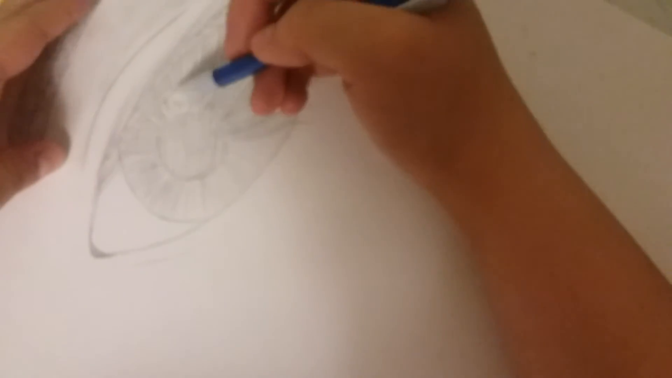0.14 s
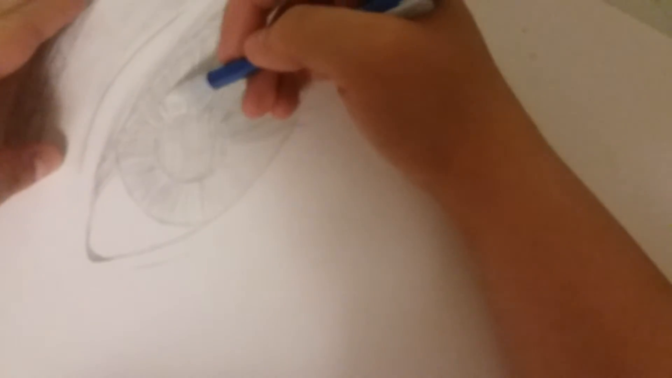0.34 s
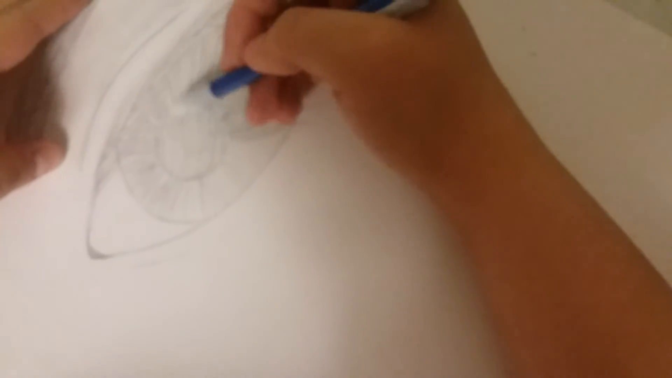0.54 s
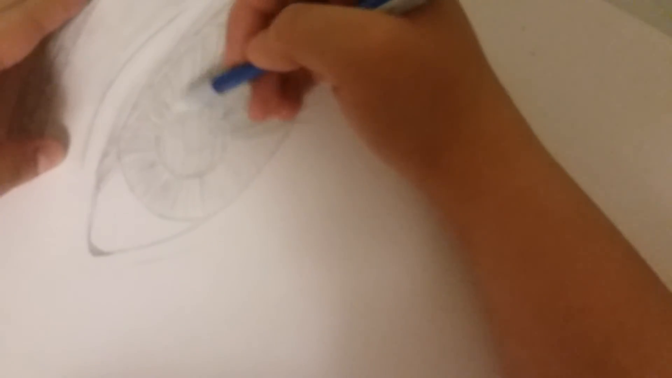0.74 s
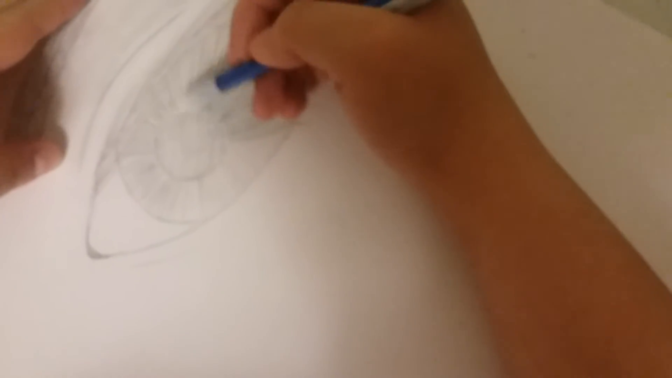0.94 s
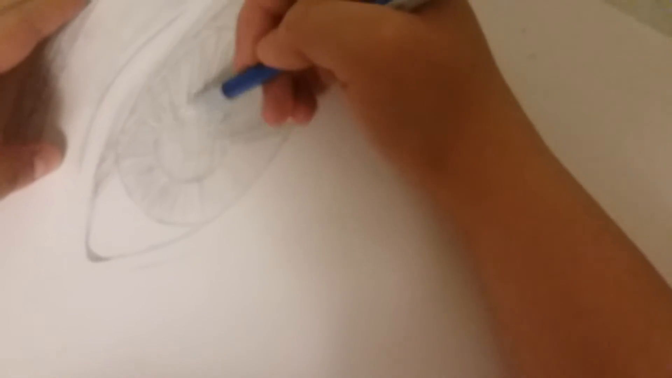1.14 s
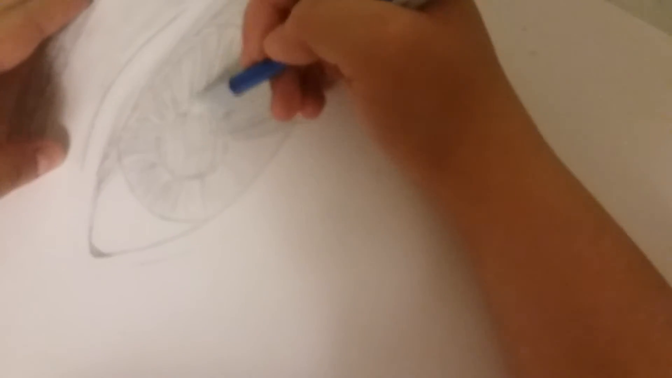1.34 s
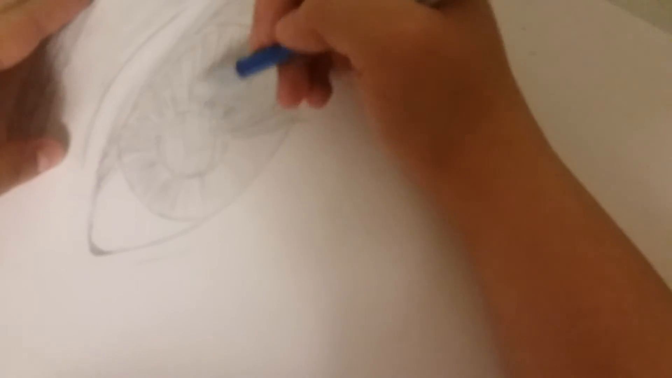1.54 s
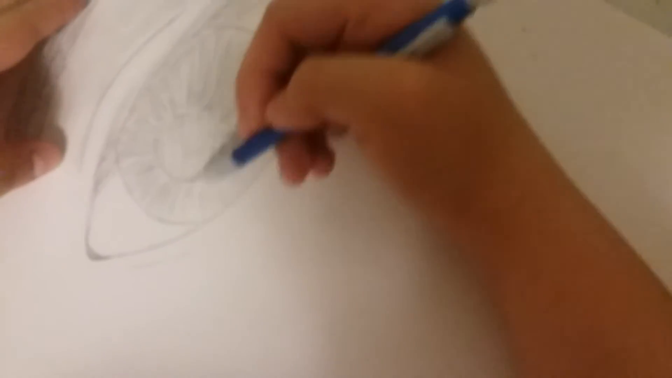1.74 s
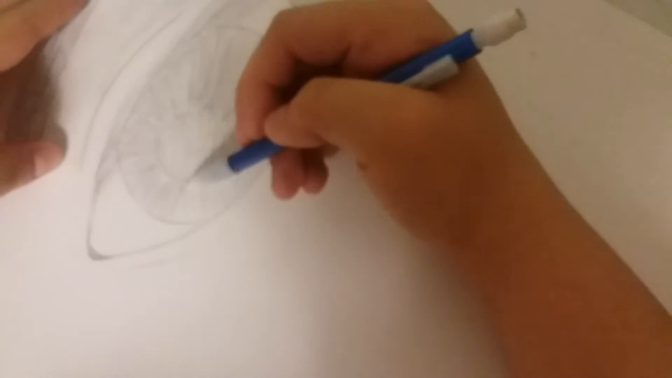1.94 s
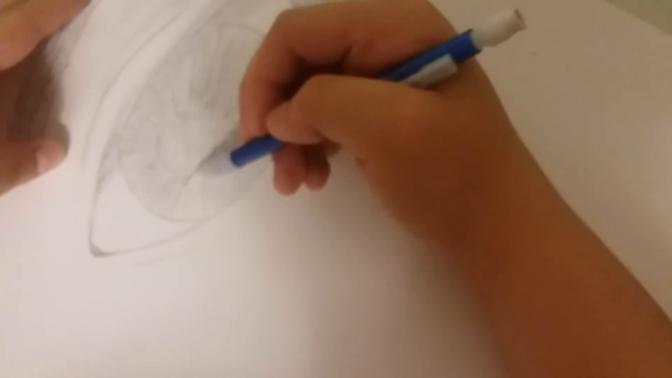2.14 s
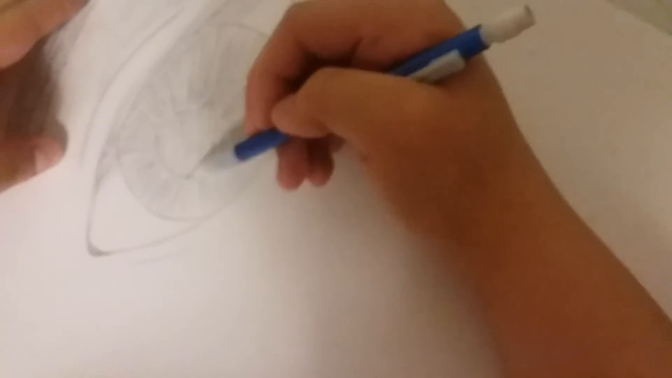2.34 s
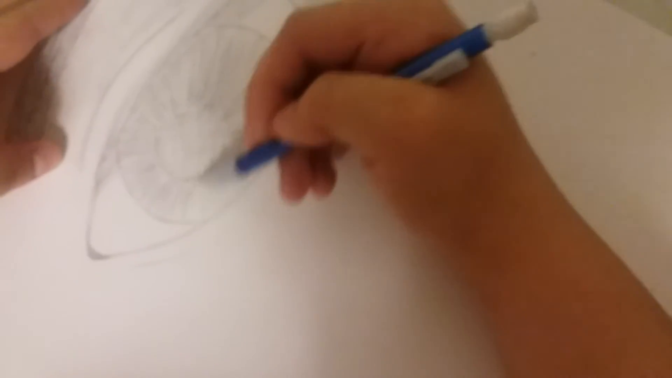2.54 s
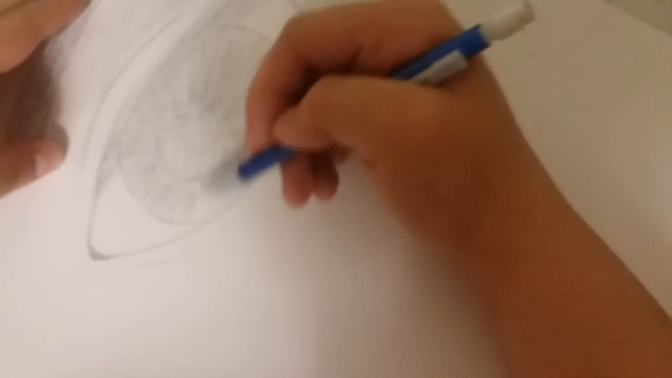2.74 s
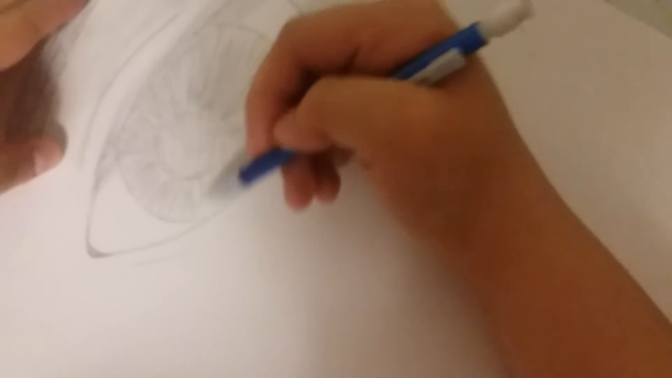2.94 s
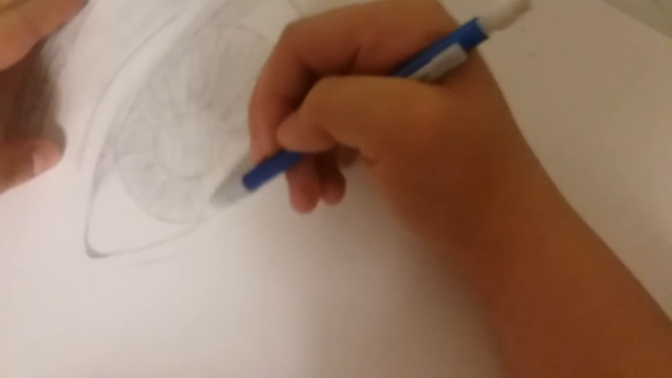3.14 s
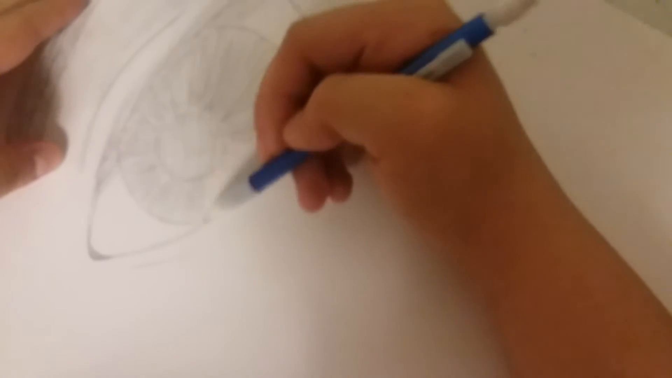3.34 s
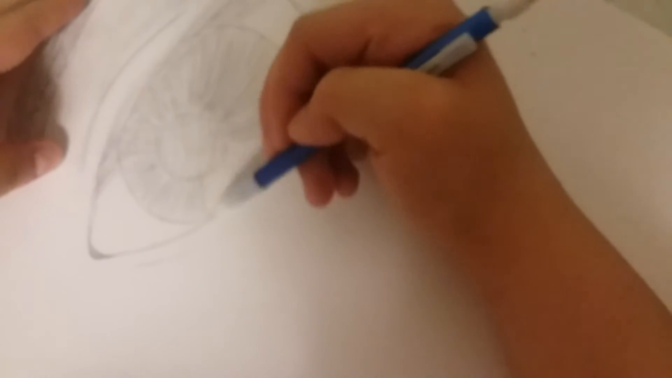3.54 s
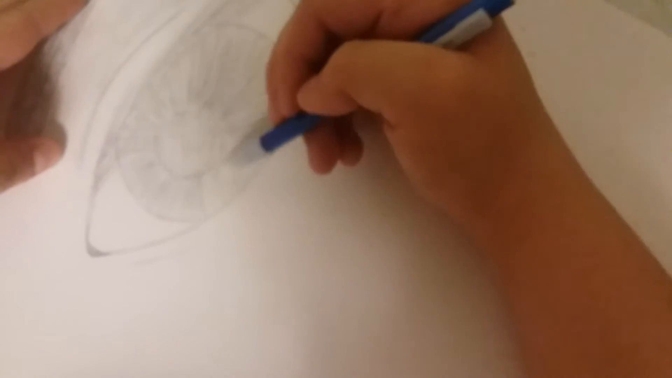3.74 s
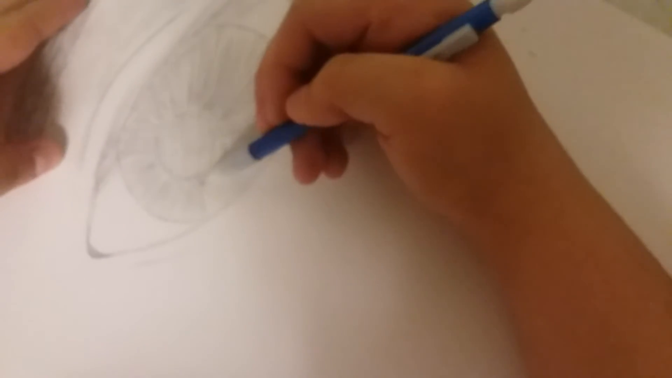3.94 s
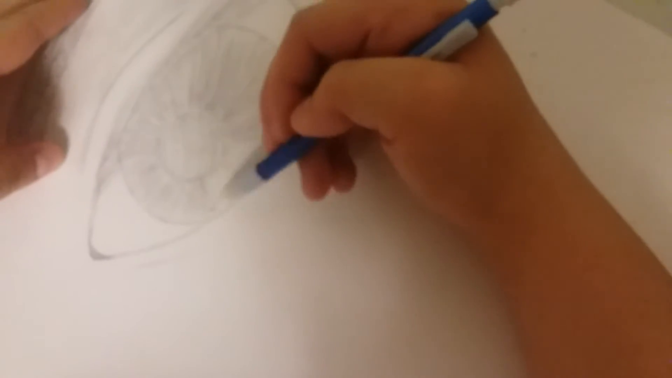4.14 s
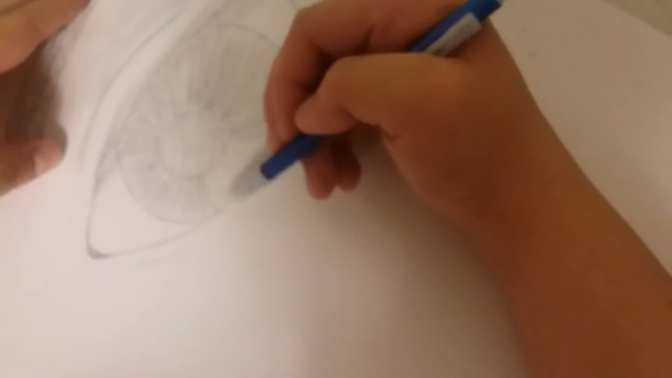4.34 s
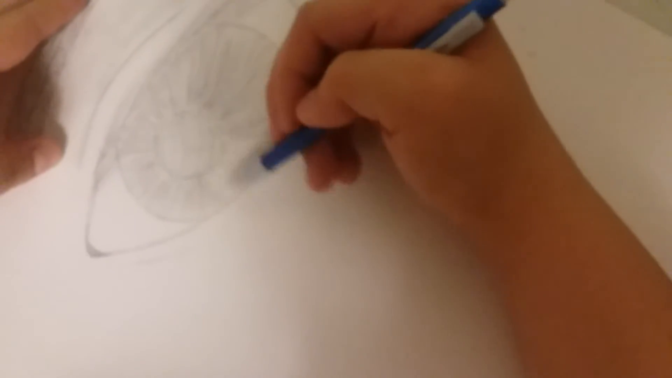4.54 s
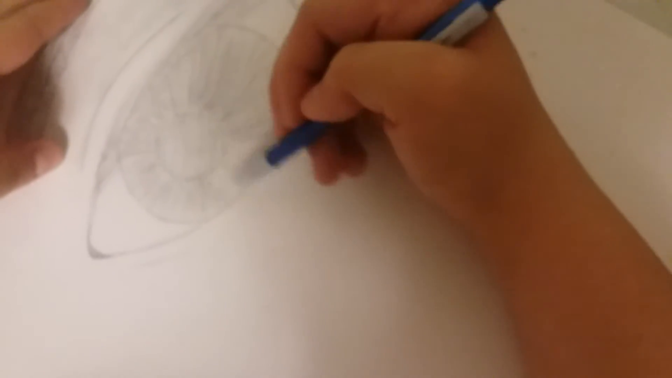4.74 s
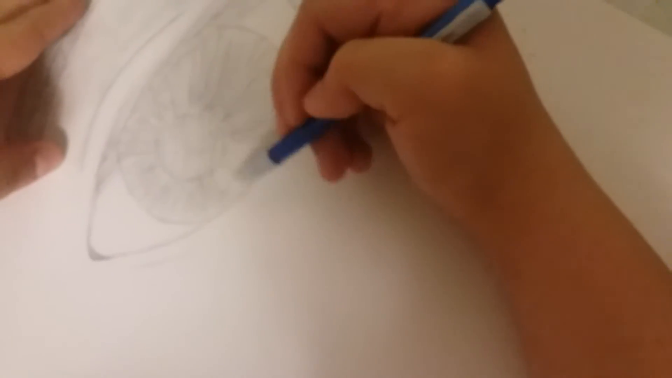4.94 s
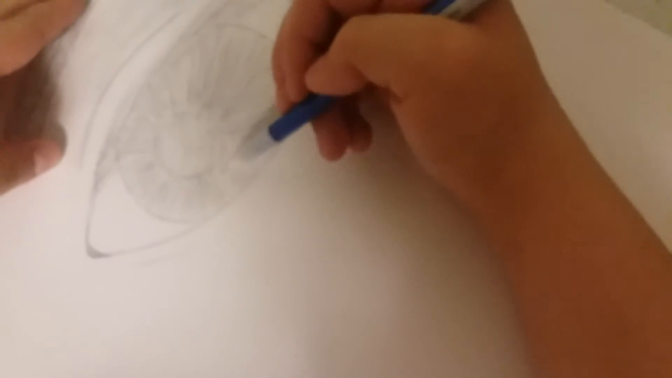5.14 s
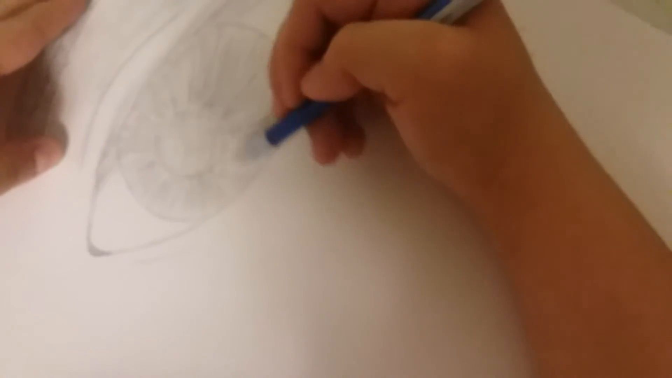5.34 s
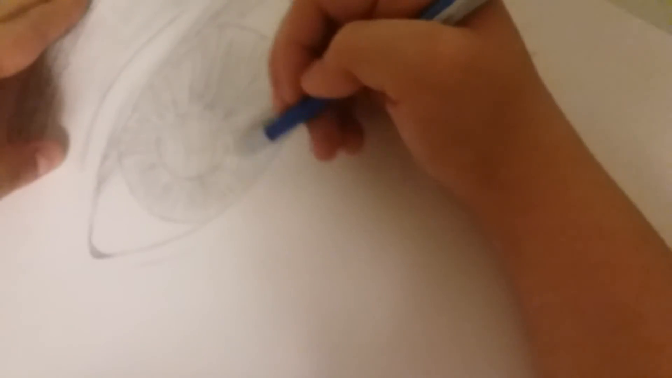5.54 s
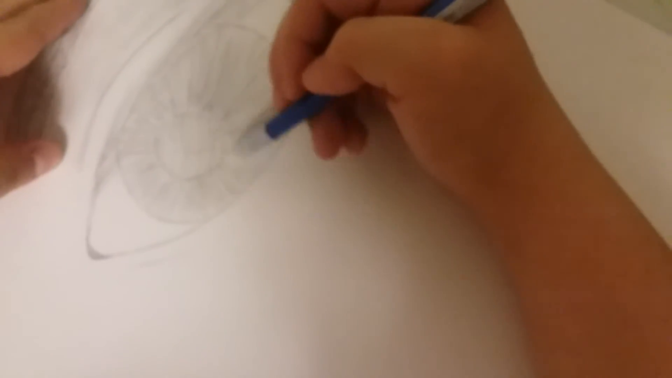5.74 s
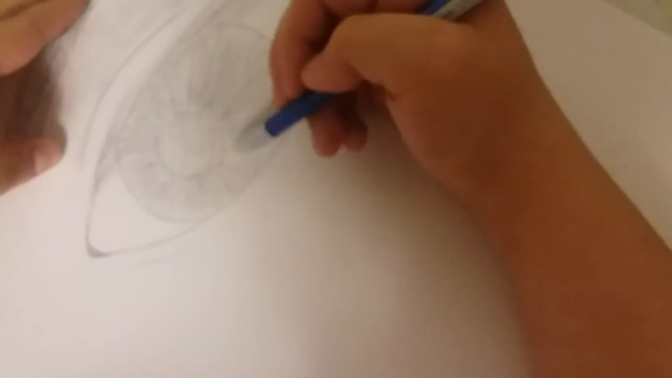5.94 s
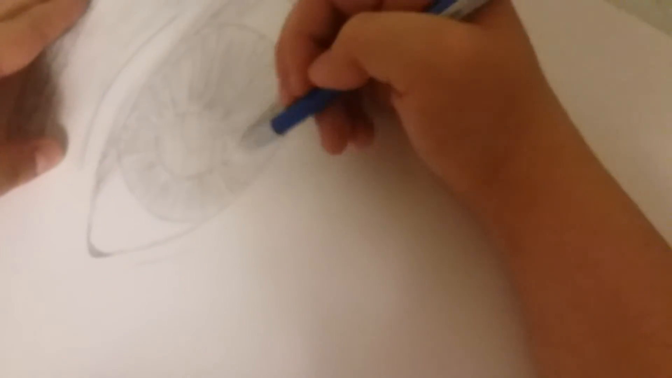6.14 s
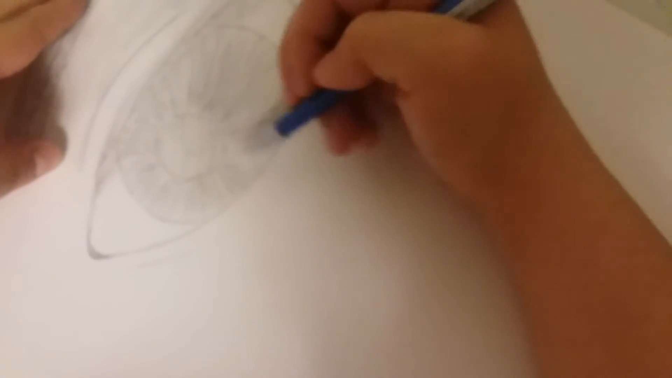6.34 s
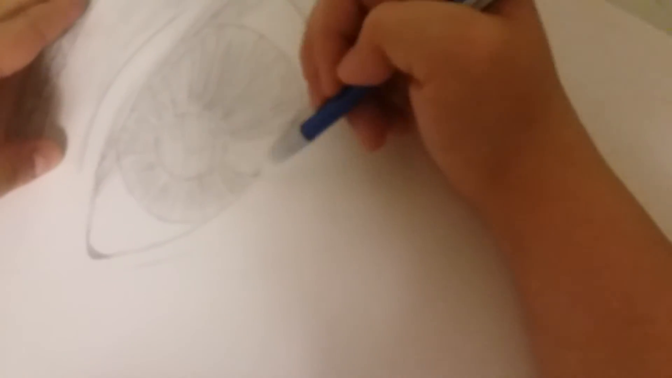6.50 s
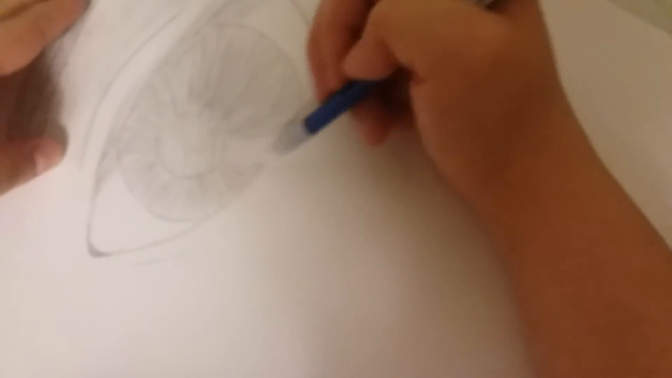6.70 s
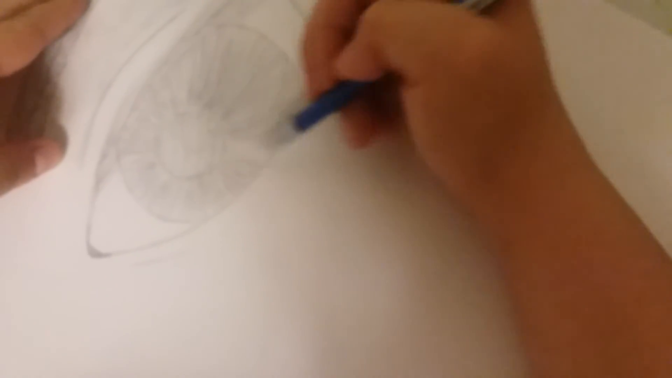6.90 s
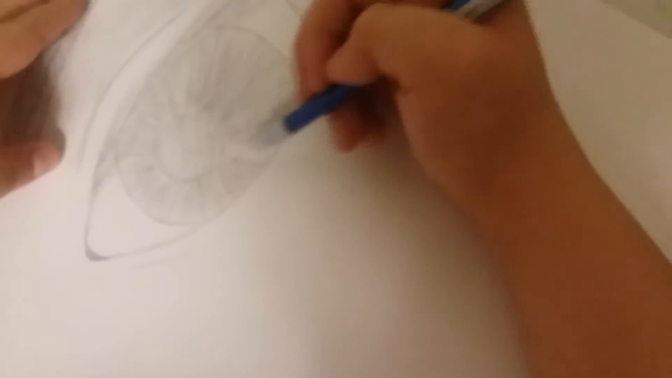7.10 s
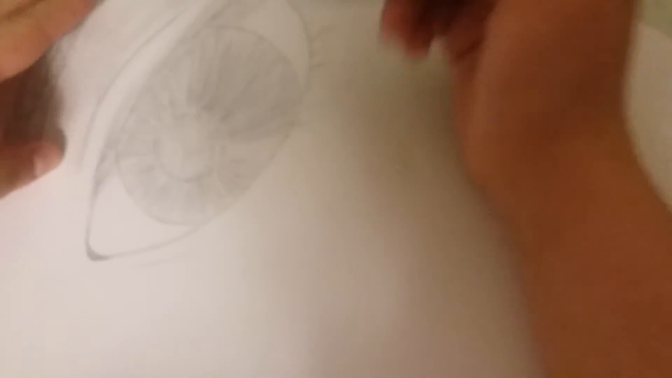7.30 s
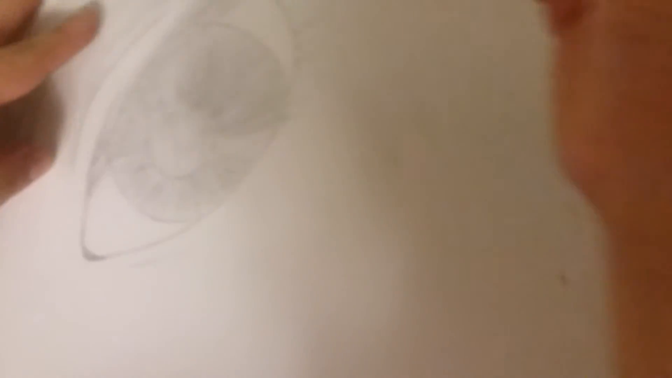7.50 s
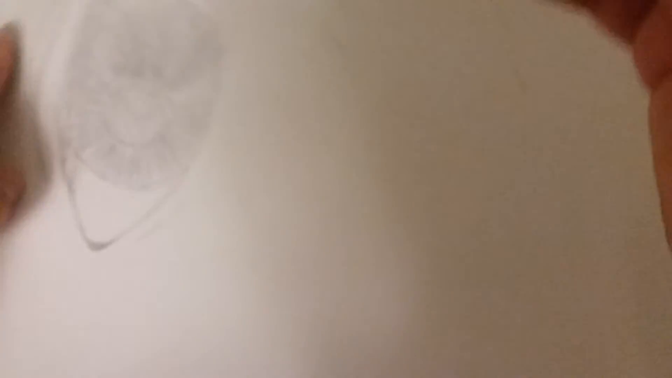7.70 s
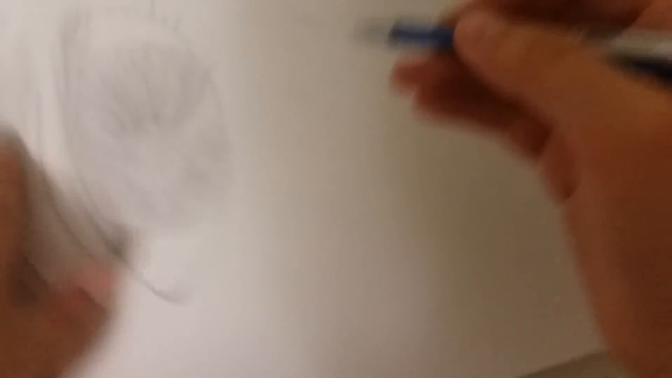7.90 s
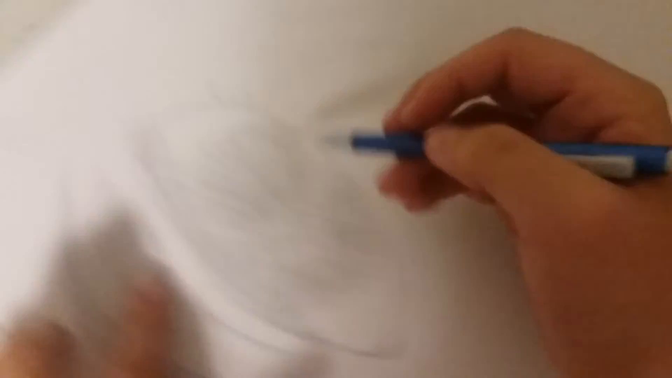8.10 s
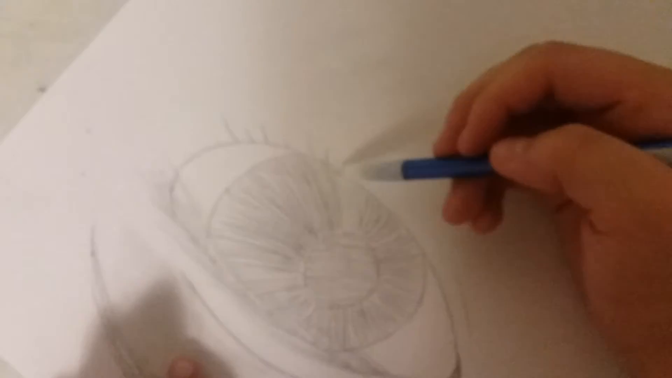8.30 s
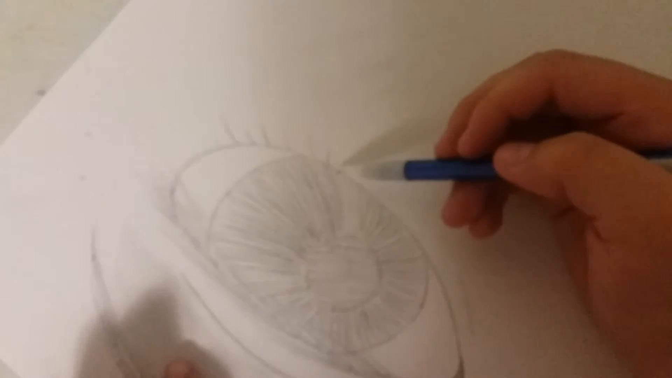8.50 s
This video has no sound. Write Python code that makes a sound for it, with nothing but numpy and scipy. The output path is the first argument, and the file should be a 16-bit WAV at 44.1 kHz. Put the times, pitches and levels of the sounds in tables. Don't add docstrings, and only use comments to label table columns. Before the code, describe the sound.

A quiet small room with faint low rumble, miked very close in stereo. At 0.1-0.4 s a hand shifts on the desk, with skin rub and a hard dry knock at 0.2. From 0.6 to 1.5 s a pencil makes quick light scratches, each about a tenth of a second, with small tip taps and thin high hiss. A pause follows; around 1.6-2.0 s the hand slides, rattles and bumps softly. From 2.2 to 5.2 s come fuller, rhythmic shading sweeps with woody ring and grit, briefly pausing near 4 s. From 5.4 to 7.4 s the strokes are shorter, sparser dabs with taps. At 7.5 s a hand drops with a heavy low thud, by far the loudest sound. The sheet turns until 8.3 s in a wide bright rasp with crackling creases, brief squeaks and a softer bump at 8.07, then fades into faint settling ticks and rubbing.

```python
import sys
import numpy as np
from scipy import signal
from scipy.fft import rfft, irfft, next_fast_len
from scipy.io import wavfile
from scipy.ndimage import uniform_filter1d

SR = 44100
rng = np.random.default_rng(int(sys.argv[2]) if len(sys.argv) > 2 else 0)


def transcribe(signal):
    frames = np.atleast_2d(signal).T
    limited = np.clip(frames, -1, 1)
    pcm = np.round(limited * 32767).astype(np.int16)
    wavfile.write(sys.argv[1], SR, pcm)


def volts_from_decibels(level):
    exponent = np.asarray(level, float) / 20
    return 10 ** exponent


N = 381906
T = np.arange(N) / SR

# start_s, peak_db, boom_over_peak_db, tick_over_peak_db
TIP_TAPS = [(0.591, -55, -38, -31), (0.765, -58.5, -12.5, -36), (0.968, -58, -6, -33),
            (1.186, -51.5, -41, -32), (2.69, -67.5, 1, -28), (2.949, -56, -10.5, -28.5),
            (3.324, -59.5, -11, -28.5), (3.505, -53.5, -16.5, -28.5), (4.312, -57, -12, -34),
            (4.35, -53, -19, -36.5), (4.537, -49, -11, -50), (4.932, -62, -0.5, -26),
            (5.403, -55.5, -7.5, -30), (5.583, -56, -18, -39.5), (5.819, -58.5, -10.5, -34.5),
            (6.009, -49.5, -8, -30.5), (6.229, -54, -12.5, -37.5), (6.453, -54.5, -6.5, -42),
            (6.591, -58.5, -27.5, -11.5), (6.69, -54, -5, -30), (6.922, -48.5, -6, -28.5),
            (7.151, -48.5, -4.5, -22), (7.336, -80, 10, -16)]
# start_s, peak_db, boom_over_peak_db, tick_over_peak_db, rattle_share
KNUCKLE_TOUCHES = [
    (0.119, -52.5, -11.5, -10.5, 0.38),
    (0.141, -60, -4.5, -5, 0.33),
    (0.218, -37, -47.5, -16, 0.383),
    (0.377, -55.5, -18.5, -26.5, 0.52),
    (1.788, -43, -26, -16.5, 1),
]
# pitch_hz, level_db, t60_s
DESK_MODES = [(418.6, -9, 0.13), (504.37, -8.5, 0.167), (638.7, -8.5, 0.081), (695.2, -6.5, 0.0516),
              (781.5, -3, 0.0663), (820.7, -8.5, 0.056), (906, 4.5, 0.034), (942.2, 1, 0.0726),
              (995.5, -0.5, 0.0445), (1101.8, -3.5, 0.042), (1175.5, -9.5, 0.074), (1356, -5.5, 0.02),
              (1457.6, -11, 0.016), (1679, -21.5, 0.066), (1854.7, -21, 0.052), (2280, -20, 0.031),
              (2390, -26, 0.023), (2815, -20.5, 0.042)]
# pitch_hz, level_db, t60_s
BOOM_MODES = [(91.67, -6.5, 0.81), (120.8, 4.5, 0.13), (171.6, 8.5, 0.14), (309.3, 9.5, 0.0414)]


def unit(x):
    return x / np.sqrt(np.mean(x ** 2))


def colour(x, points):
    hz, db = np.transpose(points)
    size = next_fast_len(N)
    log_hz = np.log(np.arange(1, size // 2 + 2) * SR / size)
    gain = volts_from_decibels(np.interp(log_hz, np.log(hz), db, -99, -99))
    return unit(irfft(rfft(x, size) * gain, size)[..., :N])


def envelope(s, db, edge_s=.006):
    return volts_from_decibels(np.interp(T, [s[0] - edge_s, *s, s[-1] + edge_s], [-120, *db, -120]))


def flicker(rate_hz, depth_db):
    hold = int(SR / rate_hz)
    steps = np.repeat(rng.standard_normal(N // hold + 1), hold)[:N]
    return volts_from_decibels(depth_db * uniform_filter1d(steps, hold))


def fibres(rate_hz, scatter_db, channels=1):
    caught = rng.random((channels, N)) < rate_hz / SR
    size = np.minimum(rng.exponential(size=(channels, N)), 4.5)
    return caught * rng.choice([-1, 1], (channels, N)) * volts_from_decibels(scatter_db * size)


def ring(modes, spread_db=0., length_s=.45, turn=-0.9815):
    hz, db, t60 = np.transpose(modes)[:, :, None]
    t = T[:int(length_s * SR)]
    luck = rng.standard_normal((len(modes), 1))
    sign = turn ** np.arange(len(modes))[:, None]
    decay = 1000. ** (-t / t60)
    return np.sum(sign * volts_from_decibels(db + spread_db * luck) * np.sin(2 * np.pi * hz * t) * decay, axis=0)


def driven(force, gain, modes):
    body = ring(modes)
    body = body / np.sqrt(np.sum(body ** 2))
    return signal.fftconvolve(unit(force) * gain, body, axes=-1)[:N]


def wandering(force, gain, low_db, drift_db, tilt_db=0.):
    scale = np.sqrt(np.sum(ring(DESK_MODES) ** 2))
    out, force = 0, unit(force) * gain
    for k, (hz, db, t60) in enumerate(DESK_MODES):
        lean = volts_from_decibels(low_db) if k < 2 else volts_from_decibels(tilt_db * np.tanh(np.log2(hz / 800)))
        share = flicker(6.4, drift_db) * lean
        pole = np.exp(2j * np.pi * hz / SR - np.log(1000) / (t60 * SR))
        push = [0, (-1) ** k * volts_from_decibels(db) * pole.imag]
        out = out + signal.lfilter(push, [1, -2 * pole.real, abs(pole) ** 2], force * share)
    return signal.sosfilt(signal.butter(3, 360, "high", fs=SR, output="sos"), out / scale)


def arches(start_s, length_s, db, growth_db, power, bite_db=0.):
    bite_at, bite_width = 0.5572, 0.0998
    out = np.zeros(N)
    for s, length, level_db, gained_db in zip(start_s, length_s, db, growth_db):
        share = np.linspace(0, 1, int(length * SR))
        bite = bite_db * np.exp(-np.abs(share - bite_at) / bite_width)
        speed = np.abs(np.sin(np.pi * share)) ** power
        gain = speed * volts_from_decibels(level_db + gained_db * (share - .5) + bite)
        at = int(s * SR) + np.arange(len(share))
        out[at[at >= 0]] += gain[at >= 0] ** 2
    return np.sqrt(out)


def add(out, s, sound, db):
    i = int(s * SR)
    part = sound[:N - i]
    out[i:i + len(part)] += part * volts_from_decibels(db) / np.abs(sound).max()


def ports(x, lag_count, left_db):
    return np.array([np.roll(x, lag_count) * volts_from_decibels(left_db / 2), x * volts_from_decibels(-left_db / 2)])


def stroke_gains():
    # start_s, length_s, hiss_db, desk_over_hiss_db, pressure_gained_db
    flicks = [(0.572, 0.0956, -61.5, 9, -35.5), (0.759, 0.067, -94, 33, -29),
              (0.786, 0.0945, -64.5, 10, -23.5), (0.983, 0.1037, -58, 8, -17),
              (1.071, 0.084, -68.5, 17, -12), (1.151, 0.1107, -59.5, 7, 3.5),
              (1.24, 0.073, -73.5, 18.5, 10), (1.325, 0.087, -64.5, 9.5, -16.5),
              (1.392, 0.0773, -62.5, 10, -4.5), (1.461, 0.0804, -64, 11, -3.5)]
    sweeps = [(2.198, 0.138, -58, 6.06, -12.5), (2.386, 0.0472, -76, 11.5, -11),
              (2.423, 0.1485, -56, 7.1, 0.5), (2.659, 0.1379, -56.5, 5.62, -9),
              (2.775, 0.113, -82, 9.4, 2.5), (2.843, 0.0272, -66.5, 6.5, -5),
              (2.867, 0.1423, -56, 6.73, -7.5), (2.99, 0.0735, -79.5, 8.3, -1.5),
              (3.047, 0.057, -72, 7.7, -6), (3.09, 0.1376, -54, 5.1, -4.5), (3.215, 0.132, -80, 13.7, 9),
              (3.29, 0.1398, -56, 6.47, 4), (3.42, 0.072, -79.5, 6, 3.5), (3.485, 0.1519, -55.5, 5.6, -7),
              (3.62, 0.2674, -70, 0.28, -12.5), (4.109, 0.1213, -57.5, 5.25, -23.5),
              (4.203, 0.072, -66.5, 5, -1.5), (4.309, 0.1493, -59.5, 7.7, -3),
              (4.542, 0.1312, -56, 5.64, -8.5), (4.643, 0.083, -66.5, 6.7, -16.5),
              (4.722, 0.0226, -70.5, 15.3, 21), (4.741, 0.133, -59.5, 4.63, -5.5),
              (4.923, 0.0287, -63.5, 1.9, 16.5), (4.941, 0.1214, -54, 1.82, -17),
              (5.04, 0.184, -71, 0.78, -52.5)]
    dabs = [(5.387, 0.119, -56.5, 2.5, 14), (5.487, 0.0665, -61.5, 7.25, 15), (5.56, 0.037, -96, 2, 28),
            (5.582, 0.1574, -57, 2.82, -3), (5.804, 0.1295, -58, 3.7, -4),
            (6.013, 0.1307, -55.5, 0.88, -8.5), (6.119, 0.0555, -65, 6.64, -3),
            (6.242, 0.1098, -59, 4.04, -3), (6.333, 0.047, -79, 11.3, -25.5),
            (6.435, 0.1638, -62.5, 1, 0.5), (6.573, 0.0605, -64.5, 4.2, -18), (6.673, 0.15, -64, 4.33, 0.5),
            (6.787, 0.07, -72, 15.1, -17), (6.91, 0.1432, -62.5, 1.84, -9),
            (7.032, 0.06, -78.5, 13.7, -33.5), (7.135, 0.1444, -67, 6.4, 7),
            (7.316, 0.0786, -70, 1.02, 10.5)]
    hiss = desk = 0
    for rows, bite_db in ((flicks, 0), (sweeps, 7), (dabs, 0)):
        s, length, db, over_db, growth_db = np.transpose(rows)
        hiss = hiss + arches(s, length, db - 3.5, 0 * s + 3, power=2.135)
        desk = desk + arches(s, length, db + over_db - 4.5, growth_db, 1.937, bite_db)
    for rows, skid_db, skid_s in ((TIP_TAPS, -2.0, 0.01187), (KNUCKLE_TOUCHES, -0.5, 0.00313)):
        for s, db, *_ in rows:
            i = int(s * SR)
            desk[i:i + 4096] += volts_from_decibels(db + skid_db) * np.exp(-T[:4096] / skid_s)
    return hiss, desk


def strokes():
    # pitch_hz, density_db
    top_hiss = [(6000, -58.5), (9500, -27), (11500, -13.5), (13000, -5.5), (15300, -4.5), (15900, 3.5)]
    # pitch_hz, density_db
    mid_hiss = [(1200, -4.5), (2000, -2.5), (2900, -7), (3700, -8.5), (5000, -6), (7000, -4), (9000, -6),
                (10500, -13), (13000, -17)]
    # pitch_hz, density_db
    grind_colour = [(900, -23), (1300, 1.3), (1550, -7.5), (1900, -1.5), (2150, -6), (2450, -10),
                    (2850, -8.5), (3400, -28)]
    # start_s, lowest_modes_db, middle_hiss_db, left_over_right_db
    travel = [(.5, -15.5, 1.5, 0.5), (1.5, -7.5, 3.5, -1), (2.2, -3.5, 2.5, 0), (4.6, -1, 2.5, -3),
              (5.6, 3, 1.5, -2), (6.1, 4, 2.5, -1.5), (6.8, 8.5, 6.5, -2)]
    speed, press = stroke_gains()
    s, *columns = np.transpose(travel)
    low_db, lean_db, left_db = (np.interp(T, s, c) for c in columns)

    tenfolds = 2 * np.log10(press * 500 + 1e-3)
    desk = wandering(fibres(3000, 2.2)[0], press * flicker(60, 1.4), low_db + 3.5 * tenfolds,
                     drift_db=1.7, tilt_db=9 * tenfolds)
    boom = driven(rng.standard_normal(N), volts_from_decibels(-75) * (speed * 1000) ** 0.31, BOOM_MODES)

    top = colour(fibres(9000, 1.8, channels=3), top_hiss)
    middle_gain = volts_from_decibels(-70.5 + lean_db) * (speed * 1000) ** 0.754 * flicker(50, 3.3)
    middle = middle_gain * colour(fibres(6000, 1.1, channels=3), mid_hiss)
    direct, left, right = flicker(68, 0.69) * (speed * top + middle)
    wide = np.array([left * volts_from_decibels(-2.0), right])
    hiss = ports(direct, lag_count=4.6, left_db=-6.0) + 1.527 * wide

    grind_gain = volts_from_decibels(-65.5) * (press * volts_from_decibels(48.5)) ** 1.654 * flicker(80, 3.03)
    desk += grind_gain * colour(fibres(2494, 2.3)[0], grind_colour)
    return ports(desk + boom, lag_count=4.9, left_db=left_db) + volts_from_decibels(0.82) * hiss


def taps():
    # pitch_hz, level_db, t60_s
    thud = [(62, -3, .15), (88.1, 2.5, 0.25), (130, -1, 0.12), (159.78, -2.5, 0.44), (299, -9.5, 0.13)]
    # pitch_hz, level_db, t60_s
    corner = [(420, -9, .04), (520, -7, .04), (608, -2, .045), (673, -4, .045), (760, -3, .035),
              (829, 0.1, .035), (960, -7, .03), (1163, -7, .025), (1400, -8, .02), (1650, -8, .02),
              (1873, -9, .02), (2100, -9, .02), (2450, -12, .015), (2826, -14, .015)]
    contact = int(0.000699 * SR)
    tip, knuckles, ticks = np.zeros((3, N))
    t = T[:int(.1 * SR)]
    tick_shape = np.exp(-t / 0.00293) + 1.15 * np.exp(-t / 0.0156)
    scuff_shape = np.exp(-(t / 0.0186) ** 2) + 0.254 * np.exp(-t / 0.0234)
    tick_filter = signal.butter(2, [1000, 4300], "band", fs=SR, output="sos")
    for k, (s, db, boom_db, tick_db, *rattle) in enumerate(TIP_TAPS + KNUCKLE_TOUCHES):
        touch = k >= len(TIP_TAPS)
        out = knuckles if touch else tip
        rattle = sum(rattle)
        crack, grain = rng.standard_normal((2, len(t)))
        body = ring(corner if touch else DESK_MODES, spread_db=2., length_s=.15, turn=1.)
        push = rattle * grain * scuff_shape
        push[:contact] -= np.hanning(contact) * (1 - 1.23 * rattle)
        add(out, s - .0012, signal.oaconvolve(body, push), db + 4.0)
        add(out, s - .002, ring(thud, spread_db=3.5), db + boom_db + 8.5)
        add(ticks, s - .001, signal.sosfilt(tick_filter, crack * tick_shape), db + tick_db + 14.5)
        if not touch:
            lead = np.diff(grain + 0.54 * np.roll(grain, 1)) * np.exp(-t[1:] / 0.0012)
            add(tip, s - .0025, lead, -51.0 + 0.7 * (db + 47.5))
    near_left = ports(knuckles, lag_count=-7, left_db=-2.0)
    return ports(tip, lag_count=3.2, left_db=-2.0) + near_left + ports(ticks, lag_count=-2.5, left_db=-3.5)


def squeaks():
    # start_s, length_s, level_db, first_hz, last_hz
    chatters = [(2.945, .012, -44.5, 958.5, 940), (4.44, 0.086, -74.5, 1243, 1510),
                (6.488, 0.087, -57.5, 955, 946), (7.641, 0.054, -54.5, 848, 900),
                (7.749, .05, -46, 930, 901), (7.84, 0.082, -50.5, 910, 891),
                (7.932, .045, -49.5, 907.6, 928), (8.049, .03, -48, 740.1, 763),
                (8.106, 0.025, -45, 905, 915), (8.135, 0.016, -40.5, 882, 920)]
    s, length, db, first_hz, last_hz = np.transpose(chatters)
    glide = np.interp(T, np.ravel([s, s + length], "F"), np.ravel([first_hz, last_hz], "F"))
    hz = glide * flicker(150, 0.3547)
    line = np.sin(2 * np.pi * np.cumsum(hz) / SR) * flicker(120, 3.6)
    line = line * arches(s, length, db, 0 * s, power=0.29)
    return ports(line, lag_count=5.2, left_db=-2.0)


def hand():
    # start_s, peak_db, contact_s
    drops = [
        (7.4879, -4.5, 0.0014),
        (8.068, -31, 0.0024),
    ]
    # pitch_hz, level_db, t60_s
    drop_modes = [(82.13, -19.5, 0.32), (97, -4, 0.099), (138.5, -0.5, 0.083), (293.47, 3.5, 0.136),
                  (179.7, 6.5, 0.075), (239, -28, 0.072), (421.2, -5.5, 0.16), (514.5, -5, 0.094),
                  (637, -14, 0.36), (787, -9.5, 0.055), (876, -5, .04)]
    # start_s, peak_db, contact_s
    wrist = [(0.121, -53.5, 0.0014), (.163, -49.5, 0.003), (1.74, -59.5, 0.0022), (1.861, -48, .004),
             (1.871, -26, 0.002), (1.928, -48, 0.0025), (1.948, -44, .003), (7.312, -55.5, 0.0041),
             (7.453, -38.5, 0.001), (7.64, -44, 0.0021), (7.672, -39, 0.0018), (7.808, -44, 0.0035),
             (8.3, -55.5, 0.0033), (8.593, -67, .0033)]
    # pitch_hz, level_db, t60_s
    wrist_modes = [(88.24, -3.5, 0.12), (120.5, -15.5, 0.1), (171.6, 4.5, 0.11), (302.6, -6.5, 0.04),
                   (440, -4, 0.021), (682, -4.5, 0.05), (894, 1, .04)]
    out, t = 0, T[:int(.12 * SR)]
    slap_filter = signal.butter(3, [450, 1100], "band", fs=SR, output="sos")
    for blows, modes, lag_count, left_db in ((drops, drop_modes, 3.5, -3.0), (wrist, wrist_modes, -8, -2.5)):
        one = np.zeros(N)
        for s, db, contact_s in blows:
            add(one, s, -np.convolve(ring(modes), np.hanning(int(contact_s * SR))), db)
            slap = rng.standard_normal(len(t)) * np.exp(-t / 0.0093)
            add(one, s, signal.sosfilt(slap_filter, slap), db - 23.0)
        out = out + ports(one, lag_count, left_db)
    return out


def slide_gain(over_db, per_weight):
    # start_s, length_s, rasp_db, weight_db, pressure_gained_db
    skin_slides = [(-.05, 0.317, -65.5, 2.5, -23.5), (0.097, 0.1255, -62.5, 4, -24),
                   (0.197, 0.1115, -77, 22, -22.5), (1.609, 0.27, -78, -12, -5.5),
                   (1.799, 0.1, -75, 18.5, -11.5), (1.856, 0.0897, -70.5, 23.5, -17),
                   (1.879, 0.114, -74.5, 2, -9), (4.433, 0.207, -88.5, 27, -2.5),
                   (7.402, 0.0816, -73.5, 24.5, 12.5), (7.477, 0.1018, -66, 39.5, -15),
                   (8.578, 0.071, -87, 20.5, -5.5)]
    # start_s, rasp_db, weight_db
    page_turn = [(7.517, -64.5, 14), (7.545, -54, 10), (7.6, -46, -3), (7.7, -42.5, -15.5),
                 (7.776, -42.5, -9.5), (7.82, -46, -14), (7.872, -44.5, -12.5), (7.922, -45.5, -10.5),
                 (7.986, -45, -19), (8.042, -42.5, -18), (8.12, -41.5, -19), (8.14, -45, -20),
                 (8.175, -43.5, -13.5), (8.217, -53, -6.5), (8.29, -55.5, -3.5), (8.335, -68.5, 6.5),
                 (8.39, -75, 8), (8.43, -81.5, 16)]
    s, length, db, weight_db, growth_db = np.transpose(skin_slides)
    turn_s, turn_db, turn_weight_db = np.transpose(page_turn)
    skin = arches(s, length, db + per_weight * weight_db, growth_db, power=0.85)
    sheet = envelope(turn_s, turn_db + per_weight * turn_weight_db)
    return volts_from_decibels(over_db) * np.maximum(skin, sheet)


def rasp_bands(grit):
    # start_s, centre_hz, lift_db
    loud_region = [(2.1, 5000, -12.67), (7.4, 1800, 3.5), (7.51, 2500, 11.5), (7.55, 5500, 2.5),
                   (7.62, 7500, 0), (7.72, 7600, 3.5), (7.8, 6800, 2), (7.86, 5200, 1.5), (7.95, 4600, -2),
                   (8.03, 6500, -0.5), (8.12, 8000, -0.5), (8.2, 7000, -4), (8.27, 7600, 1),
                   (8.4, 7500, -7.5)]
    width = .35
    s, centre_hz, lift_db = np.transpose(loud_region)
    centre, lift_db = np.interp(T, s, np.log2(centre_hz)), np.interp(T, s, lift_db)
    size = next_fast_len(N)
    spectrum, out = rfft(grit, size), 0
    octave = np.log2(np.arange(1, size // 2 + 2) * SR / size)
    for middle in np.arange(9.5, 14.1, width):
        weight = np.clip(1 - np.abs(octave - middle) / width, 0, 1)
        band = irfft(spectrum * weight, size)[:, :N]
        lift = volts_from_decibels(lift_db * np.exp(-((middle - centre) / width) ** 2))
        out = out + band * flicker(40, 1.9) * lift
    return out


def slides():
    # pitch_hz, density_db
    rasp_colour = [(710, -6.5), (1200, 1), (1850, 0.5), (2120, -2), (3180, -2), (4300, 1), (6400, 0),
                   (8180, 2.5), (9790, -4), (11500, -15), (15000, -24.5), (22000, -120)]
    top_colour = [(9500, -15.0), (12000, -7.5), (14500, -8.0), (15900, -12.5)]
    sheet_colour = [(250, -6), (350, -6.5), (650, -1.0), (1000, -7.0), (1500, -14), (2500, -17.0), (6000, -32.5)]
    grit = colour(fibres(3500, 2.9, channels=2), rasp_colour)
    pressed = slide_gain(-3.5, per_weight=0.487)
    rasp = slide_gain(0, per_weight=0) * flicker(70, 0.64) * rasp_bands(grit)
    top_gain = slide_gain(-4.5, per_weight=-0.22) * flicker(76, 0.66)
    top = top_gain * colour(fibres(5700, 2.2, channels=2), top_colour)
    desk = .6 * wandering(fibres(2500, 1.7)[0], pressed, low_db=1.5, drift_db=2.5, tilt_db=-3)
    desk += 1.15 * pressed * colour(fibres(3000, 2.5)[0], sheet_colour)
    boom = driven(rng.standard_normal(N), slide_gain(-0.5, per_weight=0.916), BOOM_MODES)
    wide = (rasp + top) * volts_from_decibels(np.array([[1.5], [3.5]]))
    return wide + ports(desk + boom, lag_count=2.5, left_db=1.0)


def snaps():
    # start_s, peak_db, pitch_hz, length_s
    creases = [(7.52, -52, 13200, 0.0052), (7.547, -36.5, 11500, 0.0038), (7.637, -30.5, 6040, 0.056),
               (7.681, -25, 5600, 0.0223), (7.698, -19, 7580, 0.028), (7.712, -23, 6370, 0.038),
               (7.731, -18.5, 7420, 0.0754), (7.769, -21.5, 3380, 0.006), (7.77, -26.5, 4600, .004),
               (7.655, -29.5, 6400, 0.022), (7.69, -24, 8940, 0.034), (7.79, -25, 8420, .02),
               (7.795, -29.5, 5580, 0.018), (7.767, -31.5, 4740, 0.042), (7.768, -27.5, 7470, 0.0634),
               (7.818, -27.5, 6870, 0.0227)]
    # start_s, peak_db, pitch_hz, length_s
    settling = [(7.487, -40, 1350, .03), (7.488, -39.5, 1950, .03), (7.495, -51, 3000, .03),
                (7.497, -49.5, 4800, .02), (7.535, -45.5, 8000, .008), (7.59, -38.5, 8690, .012),
                (7.72, -39.5, 2000, .04), (7.98, -42, 1950, .03), (8.03, -33.5, 7555, 0.085),
                (8.09, -31.5, 7940, 0.081), (8.15, -30, 8000, .04), (8.185, -35.5, 10400, .003),
                (8.211, -34.5, 12000, .003), (8.234, -40.5, 11800, .003), (8.245, -40.5, 7530, .05),
                (8.251, -34, 13330, .003), (8.256, -39, 13100, .04), (8.304, -37, 10900, .003),
                (8.323, -44, 12500, .003), (8.338, -48.5, 12700, .003), (8.345, -64, 7800, .045),
                (8.378, -56.5, 9020, .006)]
    out = np.zeros((2, N))
    for rows, left_db, right_db in ((creases, -9.0, 1.5), (settling, -1.5, 0.3)):
        for s, db, hz, length_s in rows:
            count = int(length_s * SR)
            burst = rng.standard_normal((2, 4096))[:, :count] ** 3 * np.hanning(count)
            spread = 1.07 + .0008 / length_s
            band = signal.butter(2, [hz / spread, hz * spread], "band", fs=SR, output="sos")
            burst = signal.sosfilt(band, burst)
            add(out[0], s, burst[0], db + left_db)
            add(out[1], s, burst[1], db + right_db)
    return out


def finger():
    # pitch_hz, width_hz, level_db
    hollows = [(974, 290, -4), (1700, 64, 2.5), (2755, 130, -7.5), (3660, 200, -20.5), (4430, 120, -13)]
    # start_s, level_db
    rubs = [
        [(.44, -77.5), (.5, -80.5), (.55, -81)],
        [(1.72, -91), (1.76, -78.5), (1.8, -81)],
        [(1.9, -79.5), (1.94, -76.5), (2.0, -78.5)],
        [(8.25, -56), (8.3, -60.5), (8.45, -67), (8.561, -74.5), (8.612, -79), (8.66, -70.5)],
    ]
    modes = [(hz, db + 20 * np.log10(width), np.log(1000) / (np.pi * width)) for hz, width, db in hollows]
    gain = sum(envelope(*np.transpose(rub)) for rub in rubs) * volts_from_decibels(-2.0)
    return ports(driven(rng.standard_normal(N), gain, modes), lag_count=2.3, left_db=-3.0)


def echo(x):
    t = T[:int(.4 * SR)]
    t60_s, level_db = 0.197, -11
    tail = rng.standard_normal((2, len(t))) * 1000. ** (-t / t60_s) * (t > .003)
    tail = signal.sosfilt(signal.butter(3, [500, 6000], "band", fs=SR, output="sos"), tail)
    tail = tail / np.sqrt(np.sum(tail ** 2) / 2)
    return volts_from_decibels(level_db) * signal.fftconvolve(x, tail, axes=1)[:, :N]


def room_tone():
    # pitch_hz, density_db
    room_colour = [(15, -67.5), (25, -23.5), (58, -9.5), (96, -6), (137, -12.5), (180, -15), (242, -31),
                   (292, -19), (450, -25.5), (1440, -29.5), (2400, -33.5), (3140, -38), (15900, -37.5)]
    mid, side = rng.standard_normal((2, N))
    side = signal.sosfilt(signal.butter(1, 120, "high", fs=SR, output="sos"), side)
    noise = mid + side * np.array([[1], [-1]])
    return colour(noise, room_colour) * volts_from_decibels(-70.0) * flicker(2.4, 0.52)


def scene():
    near = strokes() + taps() + hand() + slides() + snaps() + finger() + squeaks()
    return near + echo(near) + room_tone()


def roll_off(x):
    return signal.sosfilt(signal.butter(12, 15840, fs=SR, output="sos"), x)


def record(dry):
    dry = signal.sosfilt(signal.butter(4, 55, "high", fs=SR, output="sos"), dry)
    mix = signal.sosfilt(signal.ellip(10, .3, 70, 15830, fs=SR, output="sos"), dry)
    return roll_off(mix)


dry = scene()
out = record(dry)
transcribe(out)
```